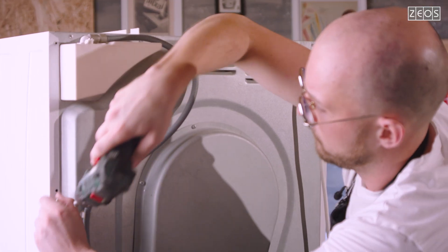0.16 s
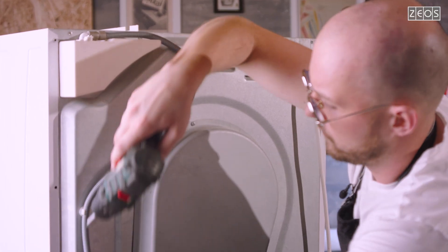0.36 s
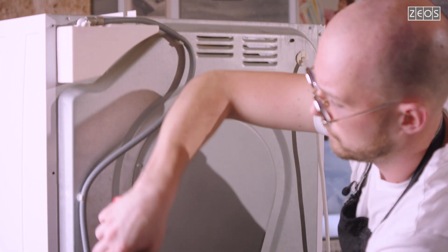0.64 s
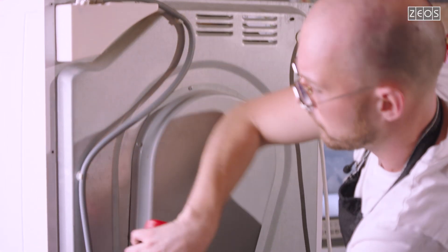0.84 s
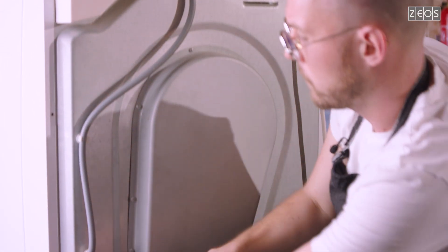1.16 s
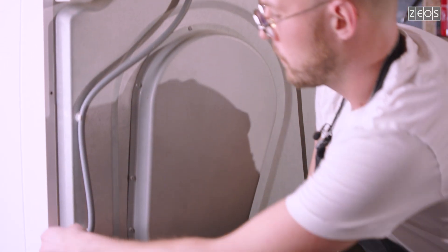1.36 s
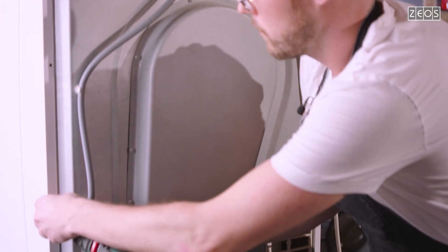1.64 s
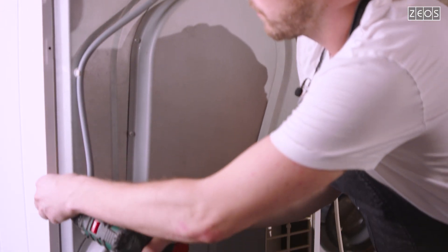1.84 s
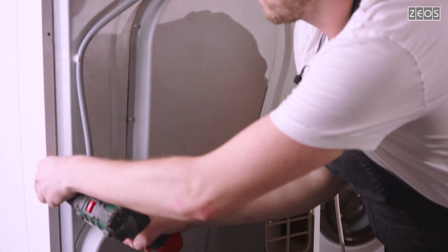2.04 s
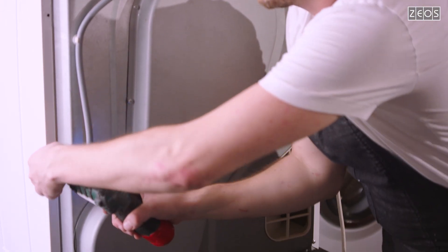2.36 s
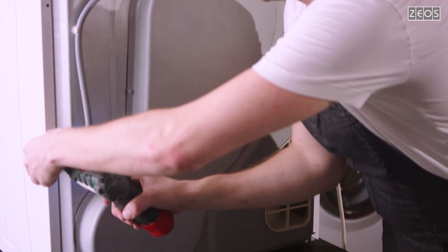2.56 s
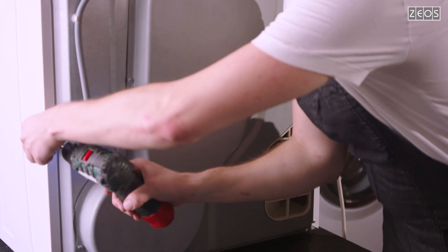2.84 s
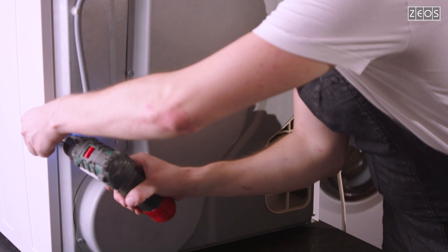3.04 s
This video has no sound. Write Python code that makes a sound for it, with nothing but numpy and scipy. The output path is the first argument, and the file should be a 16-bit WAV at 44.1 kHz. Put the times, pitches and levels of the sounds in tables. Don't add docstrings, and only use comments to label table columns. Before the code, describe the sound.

A cordless drill, close to the microphone, is already running and dies away within 0.3 s, gears hissing, steel panel drumming. Quiet handling follows: cloth rustle around 0.4-1.1 s, sharp click at 1.23, faint thin whistle near 1.5, scrapes and small knocks at 1.8-2.2. At 2.25 the drill restarts with a loud metallic jolt, high screw squeals and low bumps, then whines steadily to 3.2 s. Short room tail, faint hum.

```python
import sys
import numpy as np
from scipy import signal
from scipy.fft import rfft, irfft, next_fast_len
from scipy.io import wavfile
from scipy.ndimage import map_coordinates

SR = 44100
rng = np.random.default_rng(int(sys.argv[2]) if len(sys.argv) > 2 else 0)


def boost_factor(decibels):
    exponent = np.asarray(decibels, float) / 20
    return 10 ** exponent


def transcribe(u):
    v = np.clip(np.atleast_2d(u).T, -1, 1)
    q = np.round(v * 32767).astype(np.int16)
    wavfile.write(sys.argv[1], SR, q)


N = 141120
T = np.arange(N) / SR

# (frequency [Hz], level per Hz [dB])
AIR_COLOUR = [(15, -15), (25, -12), (102, -6), (263, -6.5), (293, -6), (607, -8.5), (775, -16.5),
              (16000, -32)]
# (frequency [Hz], level [dB])
HUM = [(24, -63), (49, -63), (102, -72), (204, -68.5), (403.7, -71.5), (619.1, -67)]
AIR_DB, HUM_SWAY_DB = -58.5, 2.5

# (time [s], effort [dB], push on the panel [dB], brush fizz [dB])
RUNS = [
    [(0, -32.5, -2.5, -2), (.1, -35, -6.5, -7.5), (.17, -42.5, -11, -10.5), (.225, -44.5, -19, -9.5),
     (.3, -62, 5.5, -13), (.45, -76, -4, -10)],
    [(2.21, -64, -32, 5), (2.25, -36.5, 7, -12), (2.3, -34, 5, -14), (2.36, -35, -5, -7.5),
     (2.45, -43, 7.5, -39), (2.51, -33.5, -1, -8), (2.64, -32, -2, -3.5), (2.8, -33, 0.5, -4),
     (3.2, -35, 3.5, -2)],
]
# (time [s], tooth rate [Hz])
GEAR_SPEED = [(0, 1000), (.12, 940), (.3, 700), (2.45, 980), (2.58, 1045), (2.63, 1140), (2.675, 1200),
              (2.97, 1210), (3.2, 1230)]
# (multiple of tooth rate, level re effort [dB], time it sounds best [s])
WHINE = [(1, -20, 2.63), (2, -12, 3.0), (2, -12, 3.09), (3, -10, 2.62), (3, -12, 2.68), (4, -10.5, 2.585),
         (4, -10.5, 2.67), (2, -13, 2.57), (3, -13, 2.56), (4, -14, 2.85), (3, -9, .01), (3, -11, .09),
         (2, -13, 2.67)]
# (frequency [Hz], level per Hz [dB])
GEAR_COLOUR = [(410, -9), (700, -1.5), (1640, -4), (2160, -1), (6400, -1.5), (13000, -29.5), (16000, -87)]
# (frequency [Hz], level per Hz [dB])
FIZZ_COLOUR = [(4000, -7.5), (7500, 8), (12000, -4), (14500, -8.5), (16000, -18)]
# (frequency [Hz], width [Hz], level [dB])
HOUSING = [(2210, 150, -2), (3200, 400, -5), (4400, 600, -3), (5800, 800, 0)]
# (frequency [Hz], width [Hz], level [dB])
HOUSING_FIRST = [(910, 220, 4), (2880, 200, 2.5), (3400, 260, 2), (4150, 470, 3), (5000, 300, 1.5),
                 (5740, 410, -5)]
GEARS_DB, GEARS_FIRST_DB = 1, -1.5
HOUSING_DB, HOUSING_FIRST_DB = -3.5, 0.5
WHINE_SPAN_S, ORDERS_DB = .04, -20.5
TEETH, BRUSH_DEPTH, GRIT_DB = 6, .1, 1

# (frequency [Hz], width [Hz], level [dB])
PANEL = [(99, 46, -5.5), (164.4, 24, 1), (205, 15.7, 5), (282.4, 51, -5), (358.7, 18, -1),
         (400, 28.5, -2.5), (447.4, 41, -3), (575, 47, -3), (615.5, 26, -3.5), (672.6, 21, -3.5),
         (806, 30, -7.5), (879, 21, -10), (1019, 39, -5.5), (1294, 67, -9.5)]
# (frequency [Hz], level per Hz [dB])
BUZZ_COLOUR = [(120, -13), (210, -6), (380, 2), (680, -3), (1300, -12.5)]
# (frequency [Hz], level per Hz [dB])
BOOM_COLOUR = [(20, -10), (50, -11), (110, -2.5), (200, -23)]
# (time [s], peak level [dB], favoured frequency [Hz])
KNOCKS = [(0.069, -20, 227), (0.842, -34, 680), (1.429, -34.5, 210), (1.459, -32, 220), (1.791, -32, 205),
          (1.887, -29, 338), (1.93, -24.5, 281), (1.975, -29.5, 205), (2.029, -37, 276), (2.08, -31, 410),
          (2.166, -25, 368), (2.215, -31, 600), (2.247, -9.5, 180), (2.259, -6, 615), (2.26, -15.5, 1130),
          (2.284, -16, 400), (2.314, -15.5, 139), (2.325, -22, 495), (2.345, -27, 394), (2.66, -19, 333),
          (3.07, -21, 1000), (3.078, -14, 187)]
# (time [s], rise [s], hold [s], level [dB])
RUB = [
    (1.43, 0.0055, 0.086, -54.5),
    (1.78, 0.053, 0.31, -50),
    (2.16, 0.01, 0.068, -44.5),
]
# (time [s], span [s], frequency [Hz], level [dB])
SINGING = [(2.18, 0.017, 400, -41), (1.85, 0.033, 205, -52.5), (2.265, 0.011, 589.5, -23.5),
           (.03, 0.059, 170, -40), (.11, 0.042, 168, -40), (.04, 0.054, 660, -44), (1.32, 0.047, 350, -60),
           (1.9, 0.017, 357, -47), (1.95, 0.056, 205, -46), (2.31, 0.03, 575, -33), (2.33, 0.039, 152, -32),
           (2.4, 0.027, 205, -41), (2.53, 0.021, 660, -32.5), (2.601, .04, 672, -32),
           (2.68, 0.023, 381, -35.5), (2.79, 0.03, 385, -34.5), (2.88, 0.066, 360, -42),
           (2.95, 0.047, 570, -44), (3.02, 0.021, 636, -33.5), (3.11, 0.036, 205, -35.5),
           (1.49, 0.036, 450, -51.5), (1.5, 0.054, 205, -54)]
DRUM_DB, BOOM_DB = -1.5, -19.5
KNOCK_S, KNOCK_DB, KNOCK_WIDE, KNOCK_EDGE_DB = 0.0051, -6, 0.89, -20
FALL_DB_PER_S = 204

# (frequency [Hz], time to fall 60 dB [s])
ROOM = [(200, 0.77), (1000, 0.67), (4700, 0.39), (9000, 0.39), (15000, 0.46)]
ROOM_DB, ROOM_WIDE_DB, ROOM_GAP_S, WIDE_FROM_HZ = -8.5, -25, .011, 1450

# (time [s], peak level [dB])
THUMPS = [(0.071, -37), (0.614, -43.5), (1.039, -41), (1.172, -52), (2.271, -31.5), (2.317, -27),
          (2.385, -33), (2.46, -33), (2.658, -37), (3.088, -32)]
THUMP_T60_S, THUMP_HZ = 0.055, 82

# (time [s], peak level [dB], ring [Hz], brightness [dB per octave])
CLICKS = [(0.073, -23, 5000, -3), (0.075, -32, 15000, 4), (0.105, -29, 6060, -3), (0.839, -44, 2420, 12),
          (0.845, -36, 7100, 1), (0.9587, -37, 2120, -0.5), (1.078, -34.5, 5300, -6),
          (1.2325, -17, 4480, -2), (1.4349, -39.5, 6100, -2), (1.627, -48, 6870, -4),
          (1.929, -39, 3500, -5), (1.9856, -44, 2550, -0.5), (2.0228, -41, 2400, -4),
          (2.027, -33.5, 2320, -3), (2.161, -38.5, 2400, -8), (2.22, -50, 5360, -11),
          (2.2603, -19.5, 3020, -7)]
# (frequency [Hz], width [Hz], level [dB])
SHELL = [(600, 310, -10.5), (1464, 880, 3.5), (2400, 4100, 0), (5290, 660, 3.5), (6640, 3800, -5.5),
         (13100, 7300, -23)]
# (frequency [Hz], width [Hz], level [dB])
CHUCK = [(4800, 420, 9.5)]
CLICK_T60_S, RING_T60_S, RING_DB = 0.014, 0.0077, -1.5
ECHO_S, ECHO_DB = .0048, 0
SPREAD_DB, CHUCK_FROM_DB = 10.5, -22

# (time [s], rise [s], hold [s], level [dB])
RUSTLE = [(.42, 0.042, 0.05, -63), (.78, 0.012, 0.17, -63), (.94, 0.067, 0.14, -56.5),
          (1.06, 0.033, 0.08, -65), (1.43, 0.0041, 0.02, -47.5), (2.03, 0.0054, 0.019, -50)]
# (frequency [Hz], level per Hz [dB])
CLOTH_COLOUR = [(410, -4.5), (700, -2), (1350, -6.5), (1870, -6.5), (7490, -14.5), (16000, -26)]

# (time [s], frequency [Hz], level [dB])
WHISTLE = [(1.36, 11350, -78), (1.43, 11500, -72), (1.48, 11400, -78), (1.525, 11750, -71),
           (1.555, 11000, -76), (1.58, 9500, -71), (1.62, 8300, -84)]

# (start [s], length [s], first pitch [Hz], last pitch [Hz], level [dB])
SQUEALS = [(2.198, .06, 6750, 5640, -28), (2.262, .035, 6300, 6150, -37), (2.31, .045, 6150, 5800, -37),
           (2.398, .05, 7300, 7030, -44), (2.446, .022, 6850, 6250, -43), (2.461, .026, 5650, 5870, -35),
           (2.48, .048, 5780, 5640, -28), (2.527, .038, 5600, 5700, -28.5), (2.95, .1, 5520, 5620, -41),
           (2.708, .055, 5650, 5830, -34), (2.865, .13, 6250, 6350, -39.5), (3.135, .08, 6280, 6310, -38)]
SETTLE, EDGE_S, GROWTH_DB_PER_HZ, OCTAVE_DB = 3.2, .01, .02, -31
SQUEAL_ROUGH_DB, SQUEAL_JITTER_HZ, SQUEAL_SMEAR_HZ = 2, 28, 50
LOUD_DB = -30

TOP_HZ = 15830


def unit(x):
    return x / np.sqrt(np.mean(x ** 2) + 1e-20)


def along(points, hz):
    f, v = np.transpose(points)
    return np.interp(np.log(hz + 1), np.log(f + 1), v)


def wobble(rate):
    return map_coordinates(rng.standard_normal(N // 20), [T * rate])


def filtered(x, response):
    m = next_fast_len(len(x) + SR // 2)
    return irfft(rfft(x, m) * response(np.fft.rfftfreq(m, 1 / SR)), m)[:len(x)]


def hiss(colour, size=N):
    return unit(filtered(rng.standard_normal(size), lambda hz: boost_factor(along(colour, hz))))


def resonant(x, peaks):
    def response(f):
        total = 0
        for k, (centre, width, db) in enumerate(peaks):
            ring = 1j * f * width / (centre * centre - f * f + 1j * f * width)
            total = total + (-1) ** k * boost_factor(db) * ring
        return total
    return filtered(x, response)


def strokes(rows):
    total = np.zeros(N)
    for s, rise, hold, db in rows:
        fade_db = FALL_DB_PER_S * np.maximum(T - s - rise - hold, 0)
        total += boost_factor(db - fade_db) * np.clip((T - s) / rise, 0, 1)
    return total


def add(track, s, x):
    part = track[round(s * SR):][:len(x)]
    part += x[:len(part)]


def air():
    hum = np.zeros(N)
    for hz, db in HUM:
        hum += boost_factor(db + HUM_SWAY_DB * wobble(23.9)) * np.sin(2 * np.pi * hz * T + wobble(12))
    return boost_factor(AIR_DB + 2.0 * wobble(4.94)) * hiss(AIR_COLOUR) + hum


def effort():
    def gain(s, db):
        return boost_factor(np.interp(T, s, db, left=-140, right=-140))

    level, shake, fizz = np.zeros((3, N))
    for s, db, push_db, fizz_db in map(np.transpose, RUNS):
        level += gain(s, db)
        shake += gain(s, db + push_db)
        fizz += gain(s, db + fizz_db)
    return level, shake, fizz


def shaft_tones(turn):
    total = np.zeros(N)
    for k in range(7, 32):
        total += boost_factor(ORDERS_DB + 5 * wobble(22)) * np.sin(k * turn / TEETH + k * k)
    return total


def motor(level, fizz):
    tooth_hz = np.interp(T, *np.transpose(GEAR_SPEED)) + 6 * wobble(51)
    turn = 2 * np.pi * np.cumsum(tooth_hz) / SR
    grit = boost_factor(GRIT_DB * wobble(1500) + 1.2 * wobble(24.83))
    grit = grit * (1 + BRUSH_DEPTH * np.sin(turn / TEETH))
    first = T < 1
    gears = unit(grit * hiss(GEAR_COLOUR)) * np.where(first, boost_factor(GEARS_FIRST_DB), 1)
    raw = grit * rng.standard_normal(N)
    housing_first = boost_factor(HOUSING_FIRST_DB) * unit(resonant(raw, HOUSING_FIRST))
    housing = np.where(first, housing_first, unit(resonant(raw, HOUSING)))
    whine = np.zeros(N)
    for k, db, s in WHINE:
        swell = np.exp(-((T - s) / WHINE_SPAN_S) ** 2)
        whine += boost_factor(db + 1.5 * wobble(42.0)) * swell * np.sin(round(k) * turn)
    tool = boost_factor(GEARS_DB) * gears + boost_factor(HOUSING_DB) * housing + 2 * whine + shaft_tones(turn)
    return level * tool + fizz * unit(grit * hiss(FIZZ_COLOUR))


def panel(shake, pressure):
    def scaled(x):
        return x / np.std(resonant(x, PANEL))

    knocks, t = np.zeros(N), T[:SR // 20]
    for s, db, hz in KNOCKS:
        burst = rng.standard_normal(len(t)) * np.exp(-t / KNOCK_S)
        push = resonant(burst, [(hz, KNOCK_WIDE * hz, 0), (1100, 700, KNOCK_EDGE_DB)])
        add(knocks, s, boost_factor(db + KNOCK_DB) * push / np.abs(resonant(push, PANEL)).max())
    buzz = boost_factor(2.1 * wobble(300)) * hiss(BUZZ_COLOUR)
    drumming = boost_factor(DRUM_DB) * shake * scaled(buzz)
    chatter = resonant(boost_factor(4.3 * wobble(45)) * rng.standard_normal(N), [(260, 240, 0)])
    rubbing = strokes(RUB) * scaled(chatter)
    boom = boost_factor(BOOM_DB + 4.6 * wobble(8.9)) * shake * pressure * hiss(BOOM_COLOUR)
    return resonant(knocks + drumming + rubbing, PANEL) + boom


def singing():
    total = np.zeros(N)
    for s, span, hz, db in SINGING:
        swell = boost_factor(db + 2 + 2.1 * wobble(60)) * np.exp(-((T - s) / span) ** 2)
        total += swell * np.sin(2 * np.pi * hz * T + 0.47 * wobble(50))
    return total


def room(x):
    hz, t, z = signal.stft(rng.standard_normal((2, SR)), SR, nperseg=256)
    fade = boost_factor(-60 * t / along(ROOM, hz)[:, None])
    tail = signal.istft(z * fade, SR, nperseg=256)[1]
    tail = tail / np.linalg.norm(tail[0])
    late = np.pad(x, (round(ROOM_GAP_S * SR), 0))
    mid, side = signal.fftconvolve(late[None], tail, axes=1)[:, :N]
    side = filtered(side, lambda f: 1 / (1 + (WIDE_FROM_HZ / (f + 1)) ** 4))
    return boost_factor(ROOM_DB) * (mid + boost_factor(ROOM_WIDE_DB) * np.outer([1, -1], side))


def thumps():
    out, t = np.zeros(N), T[:SR // 4]
    for s, db in THUMPS:
        swell = boost_factor(db - 60 * t / THUMP_T60_S) * (1 - np.exp(-t / 0.0072))
        add(out, s, swell * 2 * np.sin(2 * np.pi * THUMP_HZ * t))
    return out


def clicks():
    out, spread, t = np.zeros(N), np.zeros(N), T[:SR // 20]
    tick = 1. * (t == 0)
    for s, db, ring_hz, tilt_db in CLICKS:
        def through_body(x):
            y = filtered(resonant(x, SHELL), lambda f: (1 + 1j * f / 3000) ** (tilt_db / 6))
            return boost_factor(db) * y / np.abs(y).max()

        ring = np.sin(2 * np.pi * ring_hz * t) * boost_factor(db + RING_DB - 60 * t / RING_T60_S)
        for late_s, echo_db in (0, 0), (ECHO_S, ECHO_DB):
            snap = boost_factor(-60 * t / CLICK_T60_S) * np.clip(t / 0.00019, 0, 1) * rng.standard_normal(len(t))
            add(out, s + late_s, boost_factor(echo_db) * (through_body(snap) + ring))
        strike = tick + (db > CHUCK_FROM_DB) * resonant(tick, CHUCK)
        add(spread, s, boost_factor(SPREAD_DB) * through_body(strike))
    return out, spread


def rustle():
    grain = boost_factor(1.4 * wobble(400) + 0.54 * wobble(41.7))
    return strokes(RUSTLE) * unit(grain * hiss(CLOTH_COLOUR))


def whistle():
    s, hz, db = np.transpose(WHISTLE)
    loudness = boost_factor(np.interp(T, s, db, left=-140, right=-140) + 3.4 * wobble(59.6))
    return loudness * np.sin(2 * np.pi * np.cumsum(np.interp(T, s, hz)) / SR)


def squeal():
    out = np.zeros(N)
    jitter = SQUEAL_JITTER_HZ * wobble(120) + SQUEAL_SMEAR_HZ * wobble(900)
    flutter = wobble(140)
    for s, length, first_hz, last_hz, db in SQUEALS:
        settle = np.exp(-SETTLE * np.clip((T - s) / length, 0, 1))
        pitch = last_hz + (first_hz - last_hz) * settle + boost_factor(db - LOUD_DB) * jitter
        turn = 2 * np.pi * np.cumsum(pitch) / SR
        gate = np.clip(np.minimum(T - s, s + length - T) / EDGE_S, 0, 1)
        growth = boost_factor(db - GROWTH_DB_PER_HZ * abs(first_hz - last_hz) * settle)
        tone = np.sin(turn) + boost_factor(OCTAVE_DB) * np.sin(2 * turn)
        out += gate * growth * boost_factor(3.0 + SQUEAL_ROUGH_DB * flutter) * tone
    return out


def scene():
    level, shake, fizz = effort()
    snaps, spread = clicks()
    drill = motor(level, fizz) + squeal() + whistle()
    steel = panel(shake, shake / level) + singing()
    near = drill + steel + rustle()
    return near + snaps + room(near + spread) + thumps() + air()


def band_limit(x):
    return signal.sosfilt(signal.butter(12, 15850, fs=SR, output="sos"), x)


def record(dry):
    mix = np.array([filtered(channel, lambda hz: hz < TOP_HZ) for channel in dry])
    return band_limit(mix)


dry = scene()
out = record(dry)
transcribe(out)
```